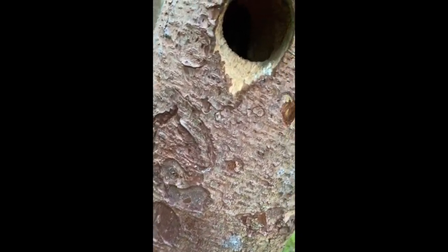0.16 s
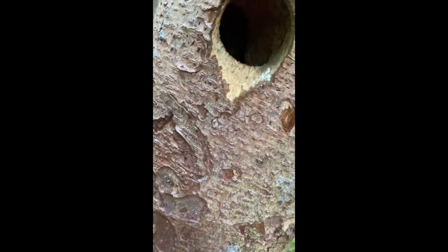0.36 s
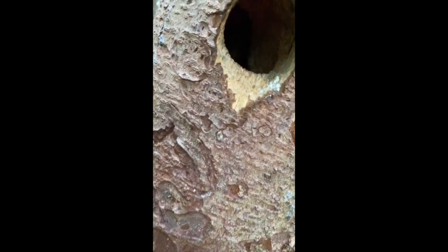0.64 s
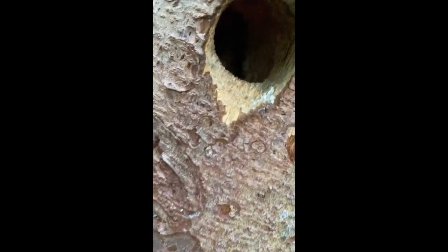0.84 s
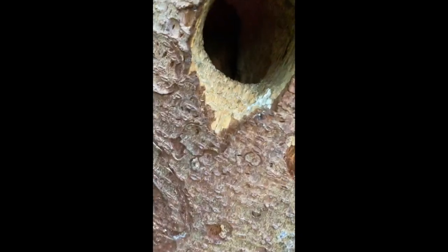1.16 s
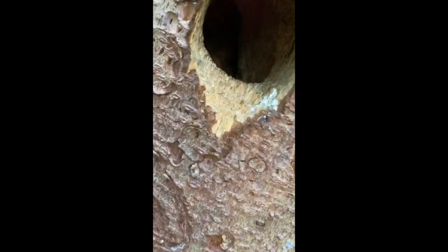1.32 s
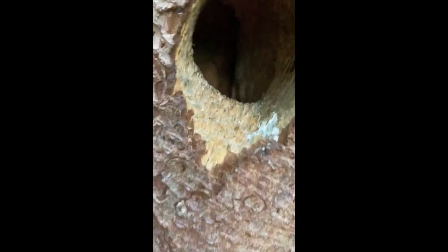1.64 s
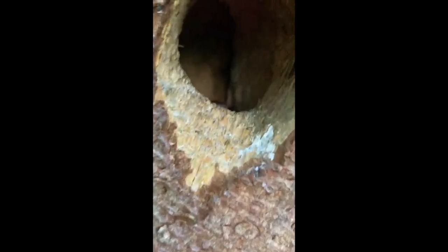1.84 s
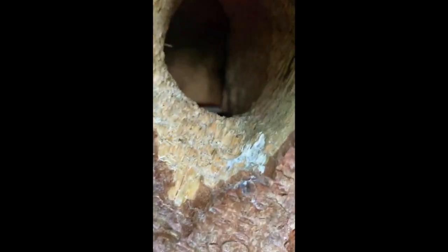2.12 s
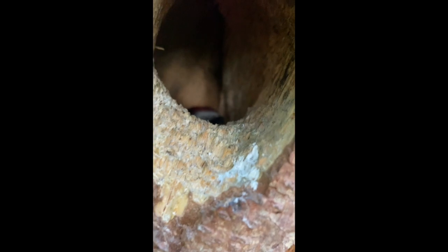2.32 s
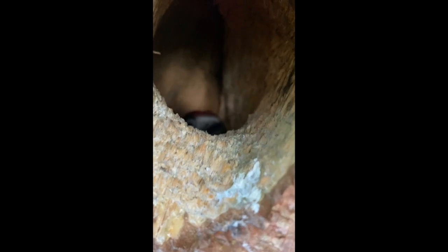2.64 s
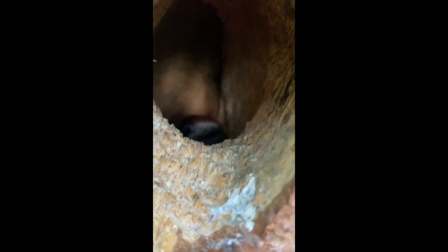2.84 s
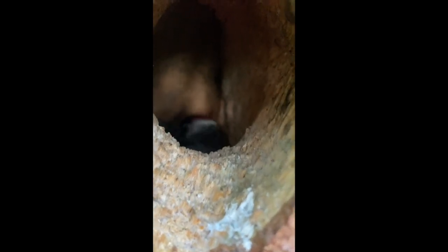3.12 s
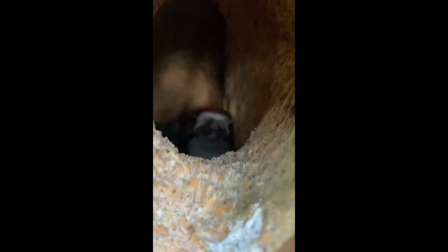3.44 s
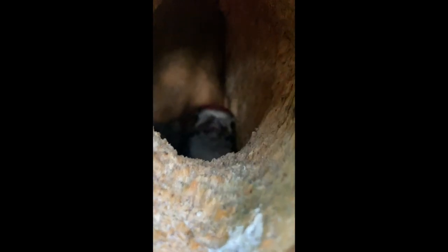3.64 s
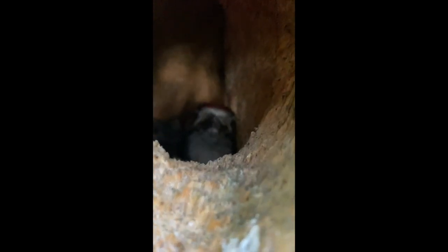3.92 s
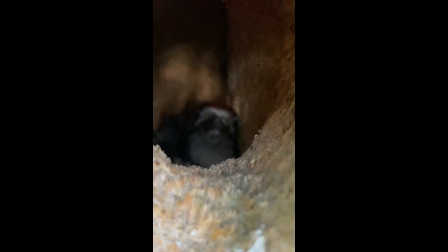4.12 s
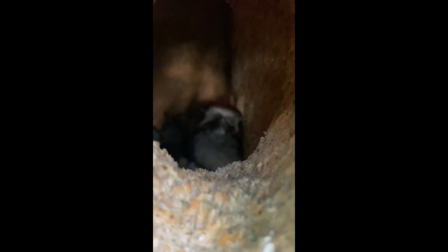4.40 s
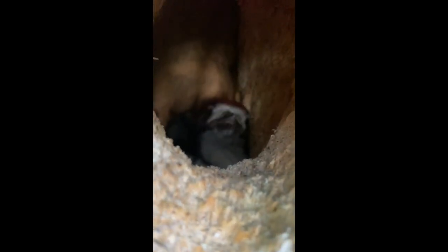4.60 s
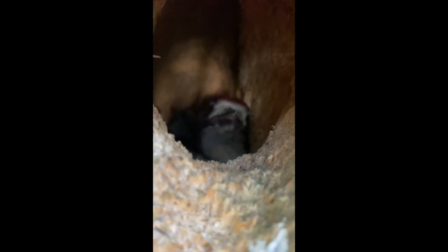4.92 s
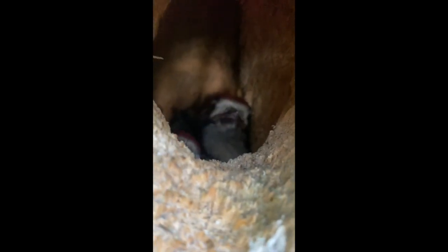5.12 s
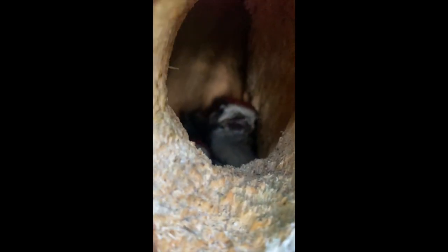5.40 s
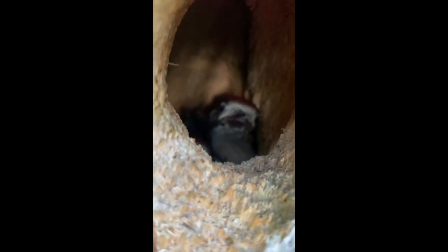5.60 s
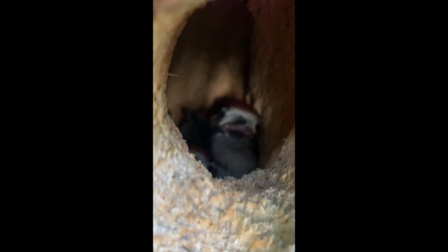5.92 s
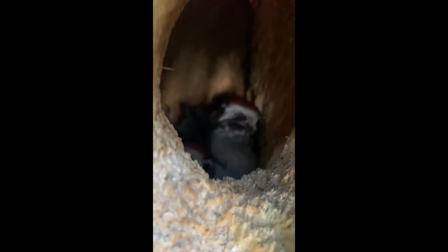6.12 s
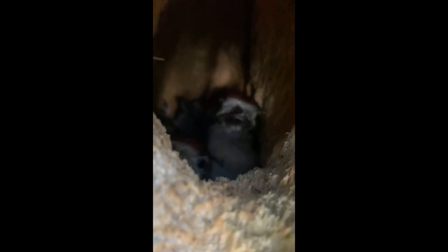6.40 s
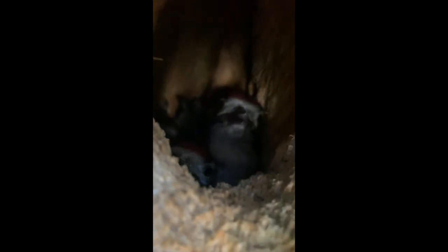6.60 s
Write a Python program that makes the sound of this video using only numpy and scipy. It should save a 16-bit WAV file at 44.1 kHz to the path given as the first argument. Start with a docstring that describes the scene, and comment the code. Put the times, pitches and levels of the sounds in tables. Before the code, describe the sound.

Two young birds beg in a quick, steady chatter of hoarse chirps from a tree hole, the second far louder, with faint woodland whistles behind.

```python
"""Woodpecker nestlings begging

Two chicks beg from a tree hole; the front chick joins the deeper one partway and is far louder.
Each call is a hoarse rising lead-in, a clear arched note and a rough tail: overtones mixed with breath noise.
Two songbirds whistle far off as wavering sines with echoes. Leaves, a murmur, a low rumble and scratchy
rustles are noises, each with its own spectrum and changing level."""
import sys
import numpy as np
from scipy import signal
from scipy.fft import rfft, irfft, next_fast_len
from scipy.io import wavfile
from scipy.ndimage import uniform_filter1d, map_coordinates

SR = 44100
rng = np.random.default_rng(int(sys.argv[2]) if len(sys.argv) > 2 else 0)


def persist_wave(psi):
    """Save psi, clipped to +-1, as 16-bit WAV."""
    counts = np.round(np.clip(psi, -1, 1) * 32767).astype(np.int16)
    wavfile.write(sys.argv[1], SR, np.atleast_2d(counts).T)


N = 297675  # length in samples


def amp(db):
    """Turns decibels into an amplitude factor."""
    return 10 ** (np.asarray(db) / 20)


def unit(x):
    """Scales a sound to an rms of 1."""
    return x / np.sqrt(np.mean(x ** 2) + 1e-20)


def along(points, hz):
    """Reads a curve of (Hz, value) points on a log frequency axis."""
    f, v = np.transpose(points)
    return np.interp(np.log(hz + 1), np.log(f + 1), v)


def wobble(rate, size=N):
    """A smooth random curve with rate random points a second."""
    return map_coordinates(rng.standard_normal(int(size * rate / SR) + 4), [np.arange(size) * rate / SR])


def filtered(x, response):
    """Shapes a sound by a response that depends on frequency."""
    m = next_fast_len(N + 8192)
    spectrum = rfft(x, m) * response(np.fft.rfftfreq(m, 1 / SR))
    return irfft(spectrum, m)[..., :N]


def add(track, s, sound):
    """Mixes a sound into the track from time s on, cutting what falls outside."""
    i = round(s * SR)
    part = track[max(i, 0):][:len(sound) + min(i, 0)]
    part += sound[max(-i, 0):][:len(part)]


def scattered(x, decays):
    """Echoes as decaying noise, different left and right; each frequency dies at its own speed."""
    hz, t, z = signal.stft(rng.standard_normal((2, SR // 4)), SR, nperseg=64)
    fading = z * amp(-60 * t / along(decays, hz)[:, None])
    tail = signal.istft(fading, SR, nperseg=64)[1]
    return signal.fftconvolve(x[None], tail / np.linalg.norm(tail[0]), axes=1)[:, :N]


def rush(spectrum, alike, patchy_db):
    """Stereo noise of rms 1 with patches of random gain; alike sets how similar left and right are."""
    z = signal.stft(rng.standard_normal((2, N)), nperseg=512)[2]
    patches = uniform_filter1d(uniform_filter1d(rng.standard_normal(z.shape[1:]), 6, 0), 10, 1)
    pair = signal.istft(z * amp(patchy_db * unit(patches)), nperseg=512)[1][:, :N]
    mid, side = filtered(pair, lambda hz: amp(along(spectrum, hz)))
    turn = np.arccos(np.clip(alike, -1, 1)) / 2
    left = np.cos(turn) * mid + np.sin(turn) * side
    right = np.cos(turn) * mid - np.sin(turn) * side
    return unit(np.array([left, right]))


# spectrum of the rumble, only its shape counts: [pitch_hz, relative_db_per_hz]
RUMBLE_SPECTRUM = [(12, -53.5), (20, -27.5), (54, 0.5), (98, -1), (156, -8), (320, -13.5), (420, -4),
                   (700, -120)]
# rumble level over time: [time_s, level_db]
RUMBLE_LEVEL = [(0, -74), (1.4, -68.5), (3, -72.5), (5, -73), (6.75, -71)]
# soft low bumps in the rumble: [full_level_s, level_db]
RUMBLE_BUMPS = [(4.53, -61.5), (4.76, -54.5), (5.67, -71)]
BUMP_RISE_S, BUMP_T60_S = .03, 0.4  # t60: time to die away by 60 dB


def rumble():
    """Low noise that swells and sinks at random, with bumps that rise fast and die away."""
    t = np.arange(N) / SR
    level = amp(np.interp(t, *np.transpose(RUMBLE_LEVEL)) + 5.2 * wobble(6.8))
    for s, db in RUMBLE_BUMPS:
        bump = amp(db - 60 * t / BUMP_T60_S) * np.clip(t / BUMP_RISE_S, 0, 1)
        add(level, s - BUMP_RISE_S, bump)
    return level * rush(RUMBLE_SPECTRUM, alike=.99, patchy_db=.7)


# levels of the wood's two noises over time: [time_s, murmur_db, leaves_db]
AIR_LEVELS = [(0, -65, -54), (.5, -67, -63.5), (1.8, -66, -67.5), (3.3, -71, -75), (3.8, -66.5, -56),
              (4.202, -69.5, -72.5), (6.35, -76, -68), (6.75, -56.5, -61)]
# spectrum of the wood's murmur, only its shape counts: [pitch_hz, relative_db_per_hz]
MURMUR_SPECTRUM = [(120, -45.5), (200, -9.5), (550, -12), (809, -8.5), (999, -17), (1540, -22),
                   (2000, -20.5), (2600, -42.5), (4400, -120)]
# spectrum of the leaf hiss, only its shape counts: [pitch_hz, relative_db_per_hz]
LEAVES_SPECTRUM = [(900, -28), (1800, -13), (2800, 1), (4500, -6.5), (6000, -13.5), (8000, -30),
                   (11000, -42.5), (16000, -65)]


def murmur_and_leaves():
    """A dull murmur and a hiss of leaves, noises that swell separately; the hiss is wide and patchy."""
    t = np.arange(N) / SR
    s, murmur_db, leaves_db = np.transpose(AIR_LEVELS)
    murmur_level = amp(np.interp(t, s, murmur_db) + 2.5 * wobble(20))
    leaves_level = amp(np.interp(t, s, leaves_db) + 4.7 * wobble(8.7))
    murmur = murmur_level * rush(MURMUR_SPECTRUM, alike=.88, patchy_db=1.5)
    leaves = leaves_level * rush(LEAVES_SPECTRUM, alike=0.24, patchy_db=3.5)
    return murmur + leaves


# twigs and leaves brushed: [start_s, level_db (before the fade), rise_s, t60_s]
BRUSHES = [(0.904, -39, 0.013, 0.49), (3.7, -43, 0.11, 1), (5.19, -58, 0.05, 0.12),
           (5.27, -43, 0.017, 0.83), (6.58, -43, 0.081, 0.64)]
# spectrum of the rustles, only its shape counts: [pitch_hz, relative_db_per_hz]
RUSTLE_SPECTRUM = [(800, -29.5), (2000, -7), (3000, -7), (4200, 7.5), (5500, -3), (8000, -19), (12000, -23),
                   (16000, -45)]


def rustles():
    """Short scratchy bursts of noise that rise and die away."""
    t, level = np.arange(SR) / SR, np.zeros(N)
    for s, db, rise, t60 in BRUSHES:
        add(level, s, amp(db - 60 * t / t60) * np.clip(t / rise, 0, 1))
    return level * amp(1.6 * wobble(160)) * rush(RUSTLE_SPECTRUM, alike=0.267, patchy_db=3)


def whistles(notes, waver):
    """Sine whistles that glide from point to point, shaky in pitch and uneven in level."""
    song = np.zeros(N)
    for points in notes:
        s, hz, db = np.transpose(points)
        t = np.arange(s[0] - .01, s[-1] + 0.012, 1 / SR)
        fade = np.clip(np.minimum(t - t[0], t[-1] - t) / 0.005, 0, 1)
        shaky_hz = np.interp(t, s, hz) * (1 + waver * wobble(250, len(t)))
        phase = 2 * np.pi * np.cumsum(shaky_hz) / SR
        level = amp(np.interp(t, s, db) + 3 * wobble(50, len(t)))
        add(song, t[0], fade * level * np.sin(phase))
    return song


# the high bird's falling whistle: [after_start_s, pitch_hz, relative_level_db]
FALLING_WHISTLE = [(0, 6000, -10), (.025, 4850, -2), (.055, 4420, 0), (.11, 4450, -1), (.13, 4450, -11),
                   (.24, 4450, -11)]
# its rising whistle: [after_start_s, pitch_hz, relative_level_db]
RISING_WHISTLE = [(0, 4400, -10), (.04, 4640, 0), (.13, 4880, -7), (.185, 5150, -9), (.205, 5600, -18)]
# when it whistles falling: [start_s, pitch_factor, level_db]
FALLING_STARTS = [(.075, .985, -55), (.6, .985, -57), (1.44, 1.015, -65), (5.175, 1.02, -61),
                  (5.645, 1.02, -59), (6.12, 1.005, -59)]
# when it whistles rising: [start_s, pitch_factor, level_db]
RISING_STARTS = [(.31, 1.001, -48), (4.55, 1.02, -66), (5.34, 1.035, -53), (5.86, 1.025, -53),
                 (6.34, 1.03, -51)]
# the low bird's level notes: [start_s, length_s, pitch_hz, level_db]
LOW_BIRD_NOTES = [(1.4, .05, 2470, -69), (2.27, .1, 2420, -57), (2.47, .09, 2690, -71),
                  (2.66, .06, 2620, -71), (2.81, .09, 2690, -73), (3.36, .06, 2550, -73),
                  (3.52, .06, 2520, -73), (4.17, .06, 2500, -75)]
# how long near echoes in the wood last: [pitch_hz, t60_s]
WOOD_ECHO = [(500, 0.04), (3000, 0.042), (12000, 0.013)]
# how long far echoes of the songbirds last: [pitch_hz, t60_s]
GLADE_ECHO = [(2000, .35), (6000, .3)]


def songbirds():
    """The high bird repeats its two whistles, the low bird holds level notes; echoes blur both."""
    def sung(starts, whistle):
        return [[(s + after, factor * hz, db + shape_db) for after, hz, shape_db in whistle]
                for s, factor, db in starts]

    high = sung(FALLING_STARTS, FALLING_WHISTLE) + sung(RISING_STARTS, RISING_WHISTLE)
    low = [[(s, hz, db), (s + length, hz, db)] for s, length, hz, db in LOW_BIRD_NOTES]
    song = whistles(high, waver=.008) + whistles(low, waver=.014)
    near_echo = amp(3) * scattered(song, WOOD_ECHO)
    far_echo = amp(-4) * scattered(song, GLADE_ECHO)
    return song + near_echo + far_echo


LEAD_START_HZ = 1313.4  # every lead-in starts on this pitch
BREAK_S, CLIMB_BEND = 0.0091, .55  # it breaks down this long before the note; its climb is fastest at first


def call_pitch(t, lead, rise, end, tail, lead_hz, start_hz, top_hz, end_hz, tail_hz, bend):
    """Pitch in Hz: the lead-in climbs, breaks down to the note, which arches; the tail jumps and sags."""
    hz = np.interp(t, [-BREAK_S, -.002, end, end + 0.0035, end + tail],
                   [lead_hz, start_hz, end_hz, tail_hz, .85 * tail_hz])
    climb = np.clip((t + lead) / max(lead - BREAK_S, .005), 0, 1) ** CLIMB_BEND
    hz = np.where(t < -BREAK_S, LEAD_START_HZ + (lead_hz - LEAD_START_HZ) * climb, hz)
    upward = top_hz - (top_hz - start_hz) * np.clip(1 - t / rise, 0, 1) ** bend[0]
    hz = np.where((t >= -.002) & (t < rise), upward, hz)
    downward = top_hz - (top_hz - end_hz) * np.abs((t - rise) / (end - rise)) ** bend[1]
    return np.where((t >= rise) & (t < end), downward, hz)


def chick(calls, shape, mood, throat, gaps, hoarse, bright_db, halves_db, jitter, bend, tail_hz, decay_db,
          muffle_hz, ring, clear, smear_hz):
    """Overtones on each call's pitch, coloured by throat and hole, mixed with breath noise.

    hoarse is how breathy (0 to 1) the lead-in start and the tail are. bright_db (tilt of the overtones an
    octave, as the beak opens) and halves_db (lines halfway) are for lead-in start, lead-in and tail.
    The lead-in start lasts for clear seconds.
    """
    def colour(hz):
        gap_db = sum(db / (1 + ((hz - c) / w) ** 2) for c, w, db in gaps)
        return amp(along(throat, hz) - gap_db)

    breath = unit(filtered(rng.standard_normal(N), colour))
    # behind a half-shut beak the breath is duller
    muffled = unit(filtered(rng.standard_normal(N), lambda hz: colour(hz) / (1 + (hz / muffle_hz) ** 2)))
    tone, puff, shut = np.zeros((3, N))
    tail = shape["tail"]
    mood_s, *moods = np.transpose(mood)
    for s, lead, end, top_hz, lead_db, onset_db, top_db in calls:
        rising, stop, lead_breath, note_breath, note_halves_db, swell_db = (
            np.interp(s, mood_s, column) for column in moods)
        rise = rising * end
        end_db = top_db - shape["sag_db"]
        tail_db = end_db - shape["drop_db"]
        start_hz, end_hz = shape["start"] * top_hz, stop * top_hz
        lead_hz = LEAD_START_HZ + shape["climb_hz_per_s"] * lead
        first_db = lead_db - swell_db
        t = np.arange(-lead, end + tail + .04, 1 / SR)  # zero where the note starts
        hz = call_pitch(t, lead, rise, end, tail, lead_hz, start_hz, top_hz, end_hz, tail_hz, bend)

        knots = np.maximum.accumulate([
            -lead, .001 - lead, .008 - lead, -.014, -.003, .0045, rise, end - .003,
            end + 0.91 * tail, end + tail, end + tail + 0.005, end + tail + 0.043])
        level = amp(np.interp(t, knots, [
            first_db - 32.5, first_db - 5, first_db, lead_db, lead_db + 9.5, onset_db, top_db, end_db,
            tail_db, tail_db - 12, tail_db - decay_db, tail_db - 53.5]))

        stages = np.maximum.accumulate([
            -lead, clear - lead, clear + 0.0039 - lead, -.003, .002, end - .003, end + 0.0012])

        def staged(values):
            """Moves between values given for lead-in start, lead-in, tail and note."""
            return np.interp(t, stages, np.array(values)[[0, 0, 1, 1, 3, 3, 2]])

        rough = np.clip(staged([hoarse[0], lead_breath, hoarse[1], note_breath]), 0, .99)
        # unsteady membranes: fast pitch scatter smears the higher overtones first
        scatter = 1 + jitter * np.sqrt(rough) * wobble(891.7, len(t))
        phase = 2 * np.pi * np.cumsum(hz * scatter) / SR
        k = np.arange(1, 17)[:, None] / 2  # overtone numbers and the lines halfway
        # when every second cycle is weaker, lines appear halfway between the overtones
        halfway = amp(staged([*halves_db, note_halves_db]) + 2.2 * wobble(80, len(t)))
        halves = np.where(k % 1, halfway, 1)
        tilt = amp(staged([*bright_db, 0]) * np.log2(np.maximum(k, 1)))
        gain = colour(k * hz) * halves * tilt * (k * hz < SR / 2)
        # each overtone swells and shrinks a little on its own
        lumps = amp(uniform_filter1d(rng.normal(0, 14, gain.shape), size=200, axis=1))
        power = np.sum(gain ** 2, axis=0) / 2
        # the note flares up where an overtone sweeps through a resonance
        flare = (power / np.interp(rise, t, power)) ** staged([0, 0, 0, ring])
        # overtones towards smear_hz and above break up into noise
        smear = np.minimum((k * top_hz / smear_hz) ** 12, 2.5) * wobble(700, len(t))
        overtones = np.sum(gain * lumps * np.sin(k * phase + smear), axis=0)
        wave = overtones / np.sqrt(power) * flare
        flutter = amp((.4 + 2.2 * rough) * wobble(350, len(t)))
        breath_level = level * flutter * np.sqrt(rough)
        add(tone, s - lead, level * flutter * np.sqrt(1 - rough) * wave)
        add(puff, s - lead, breath_level * staged([.6, 0.64, 0.4, 0.44]))
        add(shut, s - lead, breath_level * staged([0.65, 0.47, 0.78, 0]))
    return tone + puff * breath + shut * muffled


# the deep chick's calls, levels at lead-in end, note start and top of the arch:
# [note_start_s, lead_in_s, note_length_s, top_pitch_hz, lead_in_db, note_start_db, top_db]
DEEP_CALLS = [(.0492, .045, 0.039, 1832, -51, -33, -34), (.0925, .025, 0.024, 1828, -47.5, -30.5, -34.5),
              (.2319, 0.035, .037, 1794, -47.5, -33, -33.5), (.3843, .045, 0.035, 1798, -50, -33.5, -33.5),
              (.5749, 0.04, 0.038, 1803, -48, -35, -34.5), (.765, 0.043, 0.033, 1800, -46, -33.5, -32),
              (.971, 0.056, 0.037, 1807, -49.5, -32.5, -31.5),
              (1.1347, 0.035, 0.033, 1834, -47, -33.5, -33), (1.3414, 0.041, 0.031, 1760, -48, -29.5, -31),
              (1.486, 0.041, .035, 1815, -44, -30, -33.5), (1.6931, 0.036, 0.036, 1825, -44, -29.5, -30.5),
              (1.8464, 0.04, 0.032, 1773, -42.5, -28.5, -30.5),
              (2.0531, 0.039, 0.039, 1800, -43.5, -28.5, -29),
              (2.2102, 0.036, 0.031, 1754, -39.5, -24.5, -29), (2.4129, .042, .035, 1790, -41, -25.5, -29),
              (2.6022, .044, 0.033, 1776, -41, -25, -26), (2.7543, 0.044, .03, 1816, -39, -24.5, -28),
              (2.9427, 0.039, 0.033, 1818, -41, -27, -28.5), (3.097, 0.043, 0.046, 1800, -39.5, -25, -25.5),
              (3.6966, 0.023, 0.027, 1816, -35, -28, -26), (3.8471, 0.047, 0.028, 1733, -36, -21.5, -23.5)]
# what all its calls share: climb_hz_per_s [Hz/s], start [note start pitch, share of the top], tail [s],
# sag_db [note end under the top, dB], drop_db [tail under the note end, dB]
DEEP_CALL_SHAPE = dict(climb_hz_per_s=9300, start=.785, tail=.019, sag_db=5, drop_db=9)
# how its calls change as the begging goes on: [time_s, rising_share of the note, end_pitch_share of the top,
# lead_in_breathiness 0-1, note_breathiness 0-1, note_halfway_lines_db, lead_in_swell_db]
DEEP_CALL_MOOD = [(0, .38, 0.86, 0.77, .1, -30, 13), (.45, 0.37, 0.93, 0.99, .1, -40, 4.4),
                  (.6, 0.64, 0.87, 0.99, .12, -44, 7.1), (1.5, 0.7, 0.88, 1, 0.38, -19.5, 2.8),
                  (2.8, 0.64, 0.79, 1, .18, -18, 3.3), (3.1, .55, .85, 0.95, 0.27, -15.5, 1),
                  (3.85, 0.54, 0.99, 0.78, 0.66, -8, 6)]
# colour of its throat and the hole: [pitch_hz, gain_db]
DEEP_COLOUR = [(300, -26), (700, -17.5), (1200, -12), (1800, -16), (2500, -6.5), (3300, -2.5), (5000, -16),
               (6200, 3), (7000, 6), (9000, -2), (11000, -15.5), (13500, -40), (15500, -4)]
# pitches its windpipe swallows: [pitch_hz, width_hz, depth_db]
DEEP_WINDPIPE = [(4040, 97, 38), (7910, 520, 56), (13400, 130, 24)]


def deep_chick():
    """The quieter, deeper chick: a slow climb to a low, breathy note."""
    return chick(DEEP_CALLS, DEEP_CALL_SHAPE, DEEP_CALL_MOOD, DEEP_COLOUR, DEEP_WINDPIPE,
                 hoarse=[.25, .35], bright_db=[-3, -3, -4], halves_db=[-30, -30, -3], jitter=0.023,
                 bend=[2.2, 3], tail_hz=1465, decay_db=20.5, muffle_hz=2640, ring=0.4, clear=0.0032,
                 smear_hz=10200)


# the front chick's calls, levels at lead-in end, note start and top of the arch:
# [note_start_s, lead_in_s, note_length_s, top_pitch_hz, lead_in_db, note_start_db, top_db]
FRONT_CALLS = [(3.122, 0.046, 0.032, 2147, -30.5, -27.5, -16),
               (3.2928, 0.062, 0.03, 2323, -29, -9.5, -11.5),
               (3.4653, 0.052, 0.028, 2136, -29.5, -18.5, -17),
               (3.6284, 0.046, .025, 2049, -31.5, -20, -22), (3.7903, 0.041, 0.02, 1970, -31.5, -23, -18),
               (3.9571, 0.039, 0.019, 1875, -32, -27, -22.5),
               (4.107, 0.044, 0.029, 2043, -31.5, -16.5, -16.5), (4.276, .045, 0.02, 2009, -32, -16, -15),
               (4.4405, .047, 0.021, 1991, -29, -12, -15.5),
               (4.5947, 0.046, 0.022, 2086, -28.5, -11, -13.5), (4.7591, 0.05, .026, 2025, -32, -13, -17.5),
               (4.9205, .045, 0.026, 2088, -29.5, -11.5, -15.5),
               (5.0822, .042, 0.025, 2084, -29.5, -9.5, -13.5),
               (5.2461, .047, .03, 2093, -30.5, -12.5, -15.5),
               (5.412, .041, 0.027, 2023, -30.5, -13.5, -17),
               (5.5883, .041, .0295, 2052, -31.5, -13.5, -17),
               (5.7452, 0.047, 0.028, 2130, -31.5, -12.5, -16.5),
               (5.9112, 0.054, .031, 2091, -29, -12, -14.5),
               (6.0719, 0.045, 0.029, 2130, -29.5, -10.5, -15.5),
               (6.2351, 0.047, 0.028, 2003, -28.5, -14.5, -15),
               (6.3931, 0.043, .026, 2060, -28.5, -10.5, -14.5),
               (6.5507, 0.047, 0.028, 2072, -27, -10, -14.5), (6.63, .022, .022, 1676, -38.5, -37, -27.5),
               (6.7077, 0.038, 0.02, 2033, -27, -13.5, -11.5)]
# what all its calls share: climb_hz_per_s [Hz/s], start [note start pitch, share of the top], tail [s],
# sag_db [note end under the top, dB], drop_db [tail under the note end, dB]
FRONT_CALL_SHAPE = dict(climb_hz_per_s=22500, start=.74, tail=.023, sag_db=6.5, drop_db=20.5)
# how its calls change as the begging goes on: [time_s, rising_share of the note, end_pitch_share of the top,
# lead_in_breathiness 0-1, note_breathiness 0-1, note_halfway_lines_db, lead_in_swell_db]
FRONT_CALL_MOOD = [(3.1, 0.45, 0.64, .4, 0.076, -25, 3.6), (3.4, 0.51, 0.61, 0.54, .12, -23, 15.5),
                   (3.7, 0.34, 0.65, 0.45, .08, -20.5, 4.8), (4.1, .3, 0.7, 0.4, 0.057, -32, 6.4),
                   (5, .3, .68, .45, 0.046, -37, 9.2), (5.8, 0.366, 0.64, .55, 0.06, -36.5, 6.7),
                   (6.75, .31, 0.56, .65, 0.067, -30.5, 8.9)]
# colour of its throat and the hole: [pitch_hz, gain_db]
FRONT_COLOUR = [(300, -35.5), (700, -20), (1200, -15.5), (2000, -2), (3000, -5.5), (4200, 3.5),
                (5300, -2.5), (6200, 3.5), (7200, 3), (8200, -8.5), (10000, -5), (12500, -21.5),
                (15000, -12)]
# pitches its windpipe swallows: [pitch_hz, width_hz, depth_db]
FRONT_WINDPIPE = [(4235, 250, 12.8), (8970, 445, 23), (13700, 140, 6)]


def front_chick():
    """The louder chick: a steep climb to a higher, clearer note."""
    return chick(FRONT_CALLS, FRONT_CALL_SHAPE, FRONT_CALL_MOOD, FRONT_COLOUR, FRONT_WINDPIPE,
                 hoarse=[.08, .5], bright_db=[-5, -8, -7], halves_db=[-35, -30, -12], jitter=0.033,
                 bend=[3.2, 2.4], tail_hz=1720, decay_db=18.0, muffle_hz=4300, ring=0.43, clear=0.017,
                 smear_hz=9000)


# how long echoes in the tree hole last: [pitch_hz, t60_s]
HOLE_ECHO = [(500, 0.043), (4000, 0.054), (14000, 0.0076)]


def nest():
    """Both chicks with echoes from the tree hole and, fainter, from the wood."""
    chicks = deep_chick() + front_chick()
    hole_echo = amp(-16.5) * scattered(chicks, HOLE_ECHO)
    wood_echo = amp(-39.5) * scattered(chicks, WOOD_ECHO)
    return chicks + hole_echo + wood_echo


def scene():
    """The begging chicks over the sounds of the wood."""
    return rumble() + murmur_and_leaves() + rustles() + songbirds() + nest()


# how far the left microphone port leads the right: [pitch_hz, lead_half_turns of phase]
PORT_LEAD = [(500, 0), (1640, .03), (2900, .32), (4300, .35), (4750, 1), (5250, 2), (6120, 2.25),
             (8100, 2.5), (10300, 2.8), (11600, 3), (16000, 3)]
TOP_HZ = 16000  # nothing is kept from here up


def record(dry):
    """Two ports that differ in phase, opposite in the high treble; the right is slightly louder."""
    def ports(hz):
        half_lead = .5 * np.pi * along(PORT_LEAD, hz)
        return np.exp(1j * half_lead * np.array([[1], [-1]])) * (hz < TOP_HZ)

    return filtered(dry * amp([[-.15], [.15]]), ports)


dry = scene()
out = record(dry)
persist_wave(out)
```